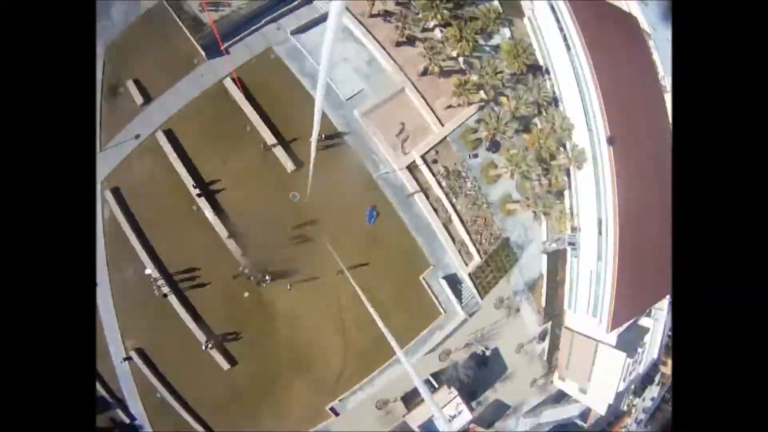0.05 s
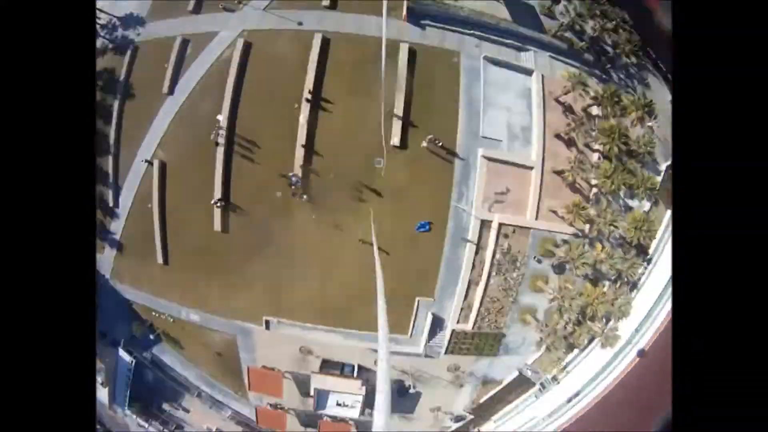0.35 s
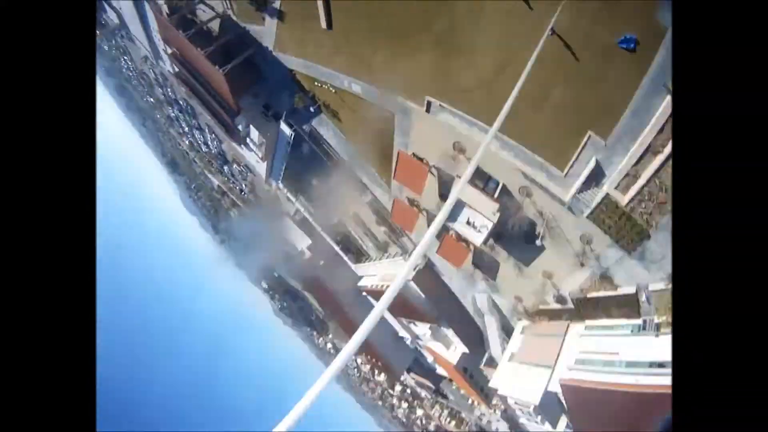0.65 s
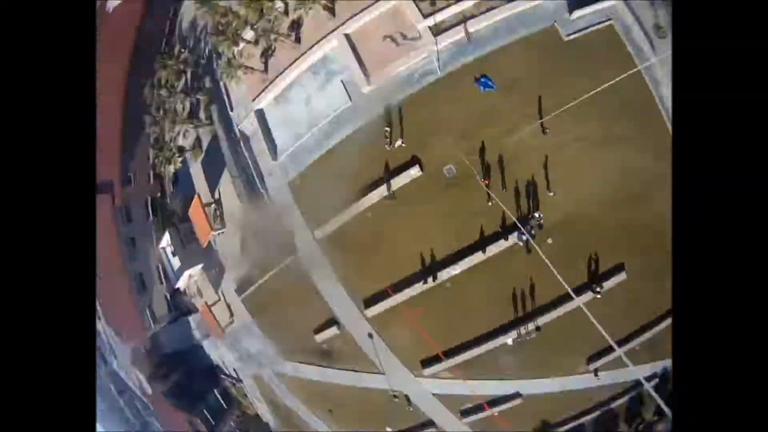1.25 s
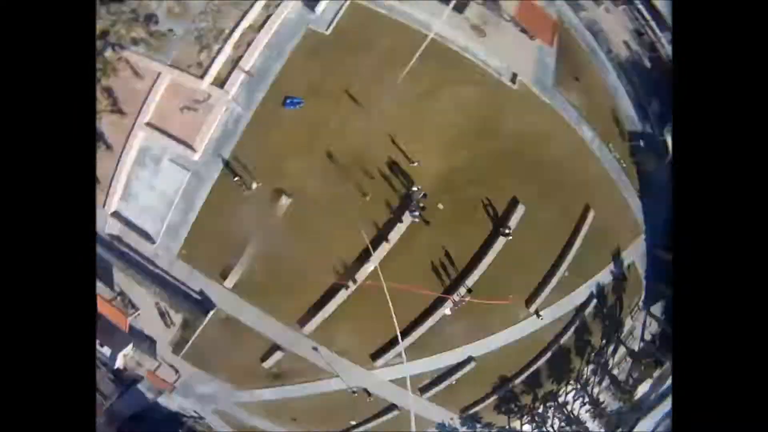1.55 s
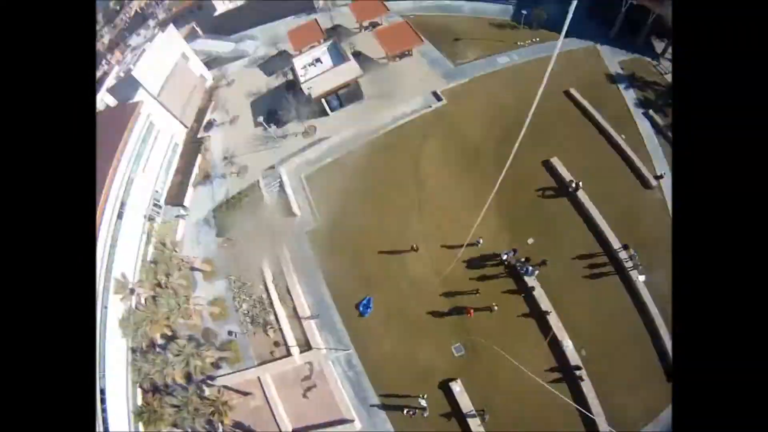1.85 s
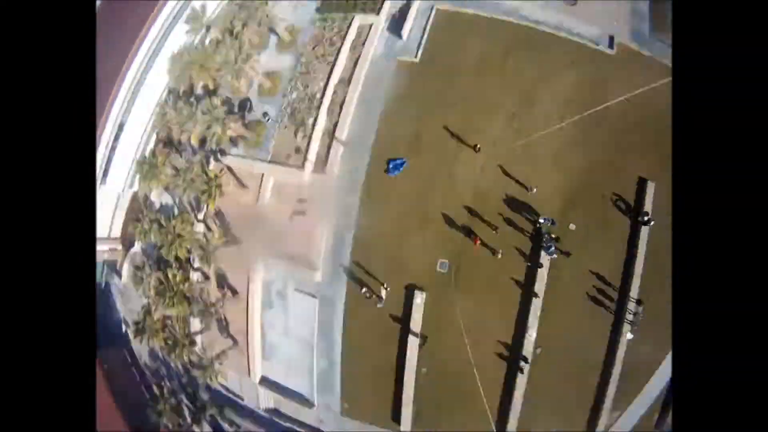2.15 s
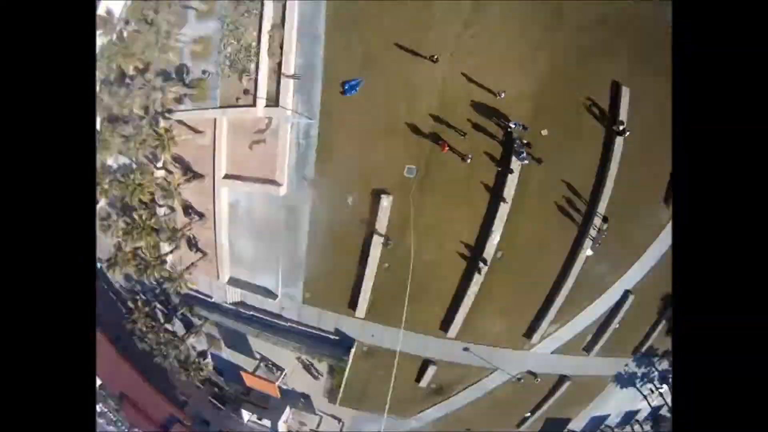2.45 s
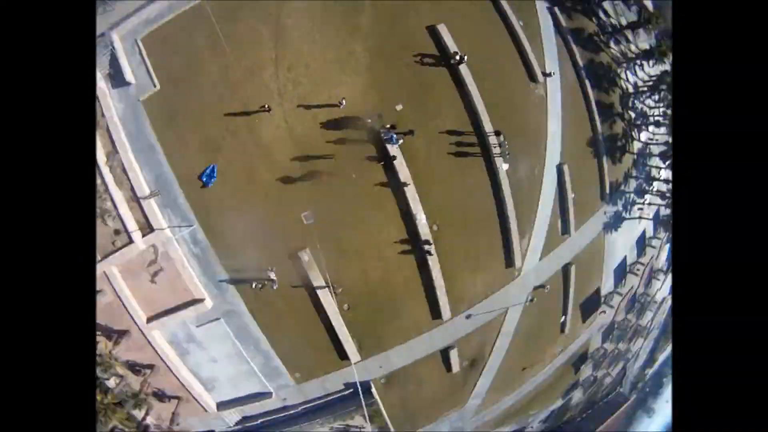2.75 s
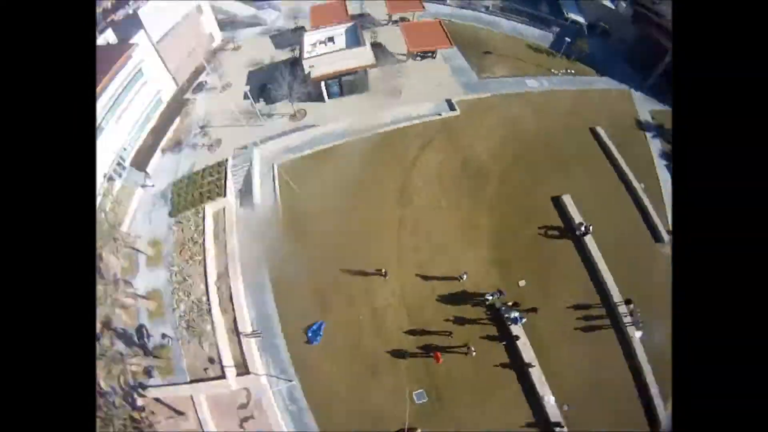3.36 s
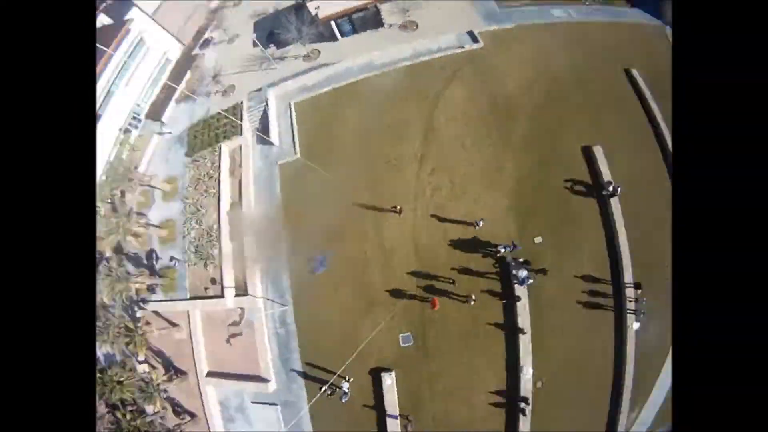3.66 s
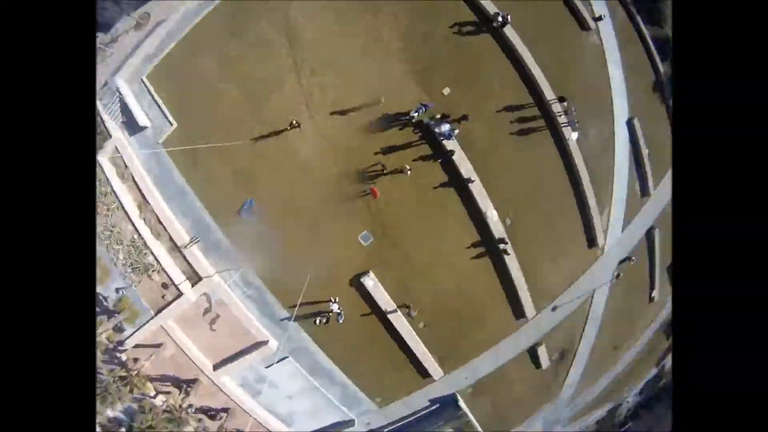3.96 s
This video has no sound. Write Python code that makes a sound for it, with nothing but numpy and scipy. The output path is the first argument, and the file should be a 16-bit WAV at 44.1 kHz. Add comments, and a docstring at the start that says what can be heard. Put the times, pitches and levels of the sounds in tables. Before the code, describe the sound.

Wind buffets the microphone of a small camera swinging high outdoors. From about 0.2 seconds its line rubs and knocks sharply on the plastic housing, whistling briefly around 0.5 seconds. A rush of air builds from 0.6 seconds and ends in a snap and low thumps near 1 second. Another thump comes at 1.6 seconds. From 2 to 4 seconds a soft, thinly sizzling hiss remains, with faint ticks.

```python
"""Wind thumps on a microphone port over an airy hiss: a small camera swings and spins on a line high
above a park. The rigging rubs and knocks on its plastic housing, the taut line sings briefly, and a rush
of air builds and ends in a snap. The swinging calms to a soft hiss with a few faint ticks.
The camera's coarse mono recorder holds each sample, which adds a thin sizzle on top."""
import sys
import numpy as np
from scipy import signal
from scipy.fft import rfft, irfft
from scipy.io import wavfile

SR = 44100
rng = np.random.default_rng(int(sys.argv[2]) if len(sys.argv) > 2 else 0)


def generate_wav(signal):
    """Clip the signal to [-1, 1] and save it as 16-bit WAV at the path in sys.argv[1]."""
    frames = np.transpose(np.atleast_2d(signal))
    scaled = np.clip(frames, -1, 1) * 32767
    pcm = np.round(scaled).astype(np.int16)
    wavfile.write(sys.argv[1], SR, pcm)


N = 176400
T = np.arange(N) / SR

# Envelope of the wind rumble on the port: time_s, level_db
RUMBLE_ENVELOPE = [(0, -37.5), (.03, -32.5), (.1, -54), (.2, -51), (.4, -54), (.52, -62), (.6, -49),
                   (.65, -37), (.72, -46.5), (.85, -35.5), (1.03, -39.5), (1.1, -37.5), (1.24, -50.5),
                   (1.32, -45), (1.4, -49), (1.6, -42.5), (1.82, -59), (1.92, -53.5), (2.4, -56.5),
                   (3.05, -65), (3.5, -61.5), (4, -60.5)]
# Tone colour of that rumble: frequency_hz, relative_db
RUMBLE_COLOUR = [(12, -33), (25, 5), (50, -1.5), (100, -1.5), (170, -6), (250, -15.5), (500, -27),
                 (1500, -57.5)]
# Single eddies thumping the port: time_s, peak_db, width_s
EDDIES = [(0.016, -23.5, 0.002), (0.121, -33.5, 0.0033), (.968, -16.5, 0.0018), (1.011, -19.5, 0.0033),
          (1.039, -20, 0.0027), (1.312, -31.5, 0.0054), (1.576, -18.5, 0.0038)]
# Envelope of the airy hiss: time_s, level_db
HISS_ENVELOPE = [(0, -49.5), (.38, -56.5), (.8, -40), (1.2, -56.5), (1.5, -56.5), (1.76, -53), (1.84, -60),
                 (2, -56.5), (2.25, -60.5), (2.45, -59), (2.9, -62), (3.4, -62), (4, -63)]
# Tone colour of the hiss ahead of its bass cut: frequency_hz, relative_db
HISS_COLOUR = [(130, -24.5), (180, 8), (225, -28), (280, -11), (380, 4), (470, -12.5), (560, -11.5),
               (700, -10), (950, -5.5), (1240, -7.5), (1450, -6), (1600, -10), (2030, -7.5), (2300, -12),
               (2550, -23.5), (2850, -22.5), (3600, -27), (5900, -35)]
# Ringing modes of the plastic housing: pitch_hz, width_hz, gain_db
HOUSING_MODES = [(243.4, 71, -3), (386, 95.5, 3), (508, 143, -0.5), (722, 270, -8.5), (932, 90.5, 4),
                 (1169, 190, 0), (1490, 120, 3), (1732, 97, 2.5), (1886, 57, 6.5), (2072, 66, 1),
                 (2275, 41, -0.5), (2444, 150, -6), (2863, 51, -5), (3098, 143, -8.5), (3494, 280, -13),
                 (4700, 1000, -28.5)]
# Air and line rushing along the housing: start_s, rise_s, hold_s, fall_s, level_db, hollow_offset_db
RUSHES = [(.002, 0.0046, 0.0052, 0.0041, -36.5, 13.5), (0.066, 0.0024, 0.098, 0.057, -47.5, -30),
          (0.106, 0.0067, 0.011, 0.004, -45, 14), (.2, .006, 0.0047, 0.0086, -29.5, -29),
          (0.251, .004, 0.017, .006, -48, -3), (0.271, 0.0019, 0.028, 0.031, -39, 4.5),
          (0.419, 0.0012, 0.015, .02, -49, 16), (0.473, 0.073, 0.078, 0.033, -49.5, 10),
          (0.573, .012, 0.014, 0.0066, -46, 16.5), (0.589, 0.075, 0.025, 0.0068, -39.5, 7),
          (0.724, 0.019, 0.15, 0.026, -31.5, 4.5), (0.826, 0.0079, 0.017, 0.0086, -35.5, 10),
          (0.889, 0.026, 0.017, 0.019, -29, -12), (0.987, 0.011, 0.02, 0.0047, -39.5, -14),
          (1.103, 0.0018, 0.05, 0.01, -46.5, -1), (1.294, 0.0061, 0.022, 0.024, -52, 8),
          (1.545, 0.022, 0.0088, 0.0036, -47, 7), (1.643, 0.021, 0.018, 0.052, -52.5, -19)]
# The rigging striking the housing: start_s, level_db, chatter_s, hollow_offset_db, crack_offset_db
KNOCKS = [(.2102, -19, 0.00067, 3, -41), (0.2124, -23, 0.0014, -18, -42), (0.2584, -34.5, 0.0034, -16, -8),
          (0.275, -34, 0.0052, -26, -11), (0.3156, -16.5, 0.0046, -9, -49), (0.3196, -31, 0.0017, 7, -30),
          (0.3242, -17, 0.0024, -20, -48), (.337, -29, 0.003, 1, -32), (0.4023, -35, .003, 7, -8),
          (0.414, -36, .003, -18, -22), (0.4296, -14, 0.0034, 11.5, -2), (0.4305, -20.5, 0.0009, -6.5, -9),
          (0.7008, -20, 0.0048, 0, -39), (.848, -17.5, 0.014, -13, -27), (0.899, -19.5, 0.0018, -17, -10),
          (0.9553, -18.5, 0.006, 5.5, -4), (0.9691, -10, 0.0032, -20, -8.5),
          (0.9733, -36, 0.00053, -16, -11), (1.054, -52, 0.0011, -23, 4), (1.602, -44.5, 0.0027, -9, -14),
          (1.95, -47.5, 0.0042, 12, -1), (1.961, -49.5, 0.004, 11, -0.5), (2.115, -49.5, 0.0034, 13, -7),
          (2.174, -42.5, 0.0079, 1, -18), (2.31, -52, 0.0025, -1, -10), (2.349, -45, 0.0018, -3, -31),
          (2.39, -49.5, 0.0027, -2, -12), (2.462, -50.5, 0.0016, -9.5, -10), (2.84, -64, 0.0025, -2, 0),
          (3.655, -52.5, 0.00092, -15, -2)]
# Envelope of the taut line's whistle: time_s, level_db
WHISTLE_ENVELOPE = [(.44, -55), (.465, -45.5), (.494, -47.5), (.499, -39), (.52, -40), (.555, -48),
                    (.59, -70)]


def from_db(db):
    return 10 ** (np.asarray(db) / 20)


def unit_rms(x):
    return x / np.sqrt(np.mean(x ** 2) + 1e-20)


def envelope(points):
    """A fader ride through (time_s, level_db) points."""
    return from_db(np.interp(T, *np.transpose(points)))


def coloured_noise(colour):
    """Noise shaped by an EQ curve, at unit rms."""
    hz, db = np.transpose(colour)
    bins = np.maximum(np.fft.rfftfreq(N, 1 / SR), 1)
    eq = from_db(np.interp(np.log(bins), np.log(hz), db))
    return unit_rms(irfft(rfft(rng.standard_normal(N)) * eq, N))


def flutter(depth_db, rate_hz):
    """A gain that wavers at random, mostly slower than rate_hz."""
    bins = np.fft.rfftfreq(N, 1 / SR)
    drift = irfft(rfft(rng.standard_normal(N)) / (1 + (bins / rate_hz) ** 2), N)
    return from_db(depth_db * unit_rms(drift))


def resonance(x, hz, width_hz):
    """One ringing band, unity gain at its peak."""
    radius = np.exp(-np.pi * width_hz / SR)
    feedback = [1, -2 * radius * np.cos(2 * np.pi * hz / SR), radius ** 2]
    return signal.lfilter(np.array([1, 0, -1]) * (1 - radius ** 2) / 2, feedback, x + 1e-18)


def wind_buffeting():
    """Lumpy rumble on the port; each eddy thumps as a pressure peak between two troughs."""
    rumble = coloured_noise(RUMBLE_COLOUR) * envelope(RUMBLE_ENVELOPE)
    rumble *= unit_rms(flutter(depth_db=2.5, rate_hz=29))
    for time_s, peak_db, width_s in EDDIES:
        away = np.abs(T - time_s) / width_s
        rumble += from_db(peak_db) * (1 - away ** 2 / 2) * np.exp(-np.minimum(away, 50))
    return rumble


def air_hiss():
    """A smooth bed of moving air that sinks as the swinging calms."""
    bass_cut = signal.butter(2, 123, "high", fs=SR, output="sos")
    hiss = unit_rms(signal.sosfilt(bass_cut, coloured_noise(HISS_COLOUR)))
    return hiss * envelope(HISS_ENVELOPE) * flutter(depth_db=1.55, rate_hz=8.3)


def housing(force, hollow_force, damping=1, hollow_below_hz=850):
    """The plastic shell rings in modes of alternating polarity; the hollow lows get their own drive."""
    ring = 0
    for k, (pitch_hz, width_hz, gain_db) in enumerate(HOUSING_MODES):
        drive = hollow_force if pitch_hz < hollow_below_hz else force
        ring += (-1) ** k * from_db(gain_db) * resonance(drive, pitch_hz, width_hz * damping)
    return ring


def friction_rushes(grains_per_s=1700, grain_spread_db=3, grit_db=4):
    """Air and line rub along the housing, which colours each gritty, fluttering swell."""
    grains = (rng.random(N) < grains_per_s / SR) * rng.choice([-1, 1], N)
    grit = unit_rms(grains * from_db(grain_spread_db * np.minimum(rng.exponential(1, N), 4)))
    friction = rng.standard_normal(N) + from_db(grit_db) * grit
    friction *= flutter(depth_db=0.73, rate_hz=210)
    friction /= np.std(housing(friction, friction))
    power, hollow_power = 0, 0
    for start_s, rise_s, hold_s, fall_s, level_db, hollow_offset_db in RUSHES:
        attack = np.clip((T - start_s) / rise_s, 0, 1)
        release = np.exp(-np.maximum(T - start_s - rise_s - hold_s, 0) / fall_s)
        swell = from_db(level_db) * attack * release
        power += swell ** 2
        hollow_power += (from_db(hollow_offset_db) * swell) ** 2
    return housing(friction * np.sqrt(power), friction * np.sqrt(hollow_power))


def rigging_knocks(chatter_db=-23, rattle_db=-40, rattle_s=0.011, crack_hz=3200, crack_width_hz=490):
    """The rigging hits the shell: one hard contact, quick chatter, a faint rattle and a dry crack."""
    force, hollow_force, crack_force = np.zeros((3, N))
    for start_s, level_db, chatter_s, hollow_offset_db, crack_offset_db in KNOCKS:
        age_s = (np.arange(N) - int(start_s * SR)) / SR
        hit = age_s == 0
        tail_s = np.clip(age_s, 0, 1)
        chatter = from_db(chatter_db) * np.exp(-np.minimum((tail_s / chatter_s) ** 2, 50))
        rattle = from_db(rattle_db) * np.exp(-tail_s / rattle_s)
        contact = from_db(level_db) * (hit + (age_s > 0) * (chatter + rattle) * rng.standard_normal(N))
        force += contact
        hollow_force += from_db(level_db + hollow_offset_db) * hit  # only the first hit moves the lows
        crack_force += from_db(crack_offset_db) * contact
    damping = 2.44  # a hard contact chokes the shell's ring
    click = signal.unit_impulse(N)
    shell = housing(force, hollow_force, damping) / np.abs(housing(click, click, damping)).max()
    crack = resonance(crack_force, crack_hz, crack_width_hz)
    return shell + crack / resonance(click, crack_hz, crack_width_hz).max()


def singing_line(pitch_hz=1315, width_hz=55):
    """The taut line sings briefly in a narrow, unsteady whistle."""
    breathy_band = resonance(rng.standard_normal(N), pitch_hz, width_hz)
    whistle = unit_rms(resonance(breathy_band, pitch_hz, width_hz))
    gate = (T > WHISTLE_ENVELOPE[0][0]) * (T < WHISTLE_ENVELOPE[-1][0])
    return whistle * envelope(WHISTLE_ENVELOPE) * gate


def scene():
    """Every layer reaches one microphone, the same on both channels."""
    mono = friction_rushes() + rigging_knocks() + wind_buffeting() + air_hiss() + singing_line()
    return np.tile(mono, (2, 1))


def record(dry):
    """The recorder rounds off peaks, holds each slow sample for a mirrored sizzle, and cuts the top."""
    ceiling, hold_hz, cutoff_hz = 0.55, 12000, 15600
    saturated = ceiling * np.tanh(dry / ceiling)
    coarse = signal.resample_poly(saturated, hold_hz, SR, axis=1)
    stair_steps = np.repeat(coarse, 4, axis=1)
    held = signal.resample_poly(stair_steps, SR, 4 * hold_hz, axis=1)[:, :N]
    top_cut = signal.ellip(10, .2, 80, cutoff_hz, fs=SR, output="sos")
    return signal.sosfilt(top_cut, held)


dry = scene()
out = record(dry)
generate_wav(out)
```